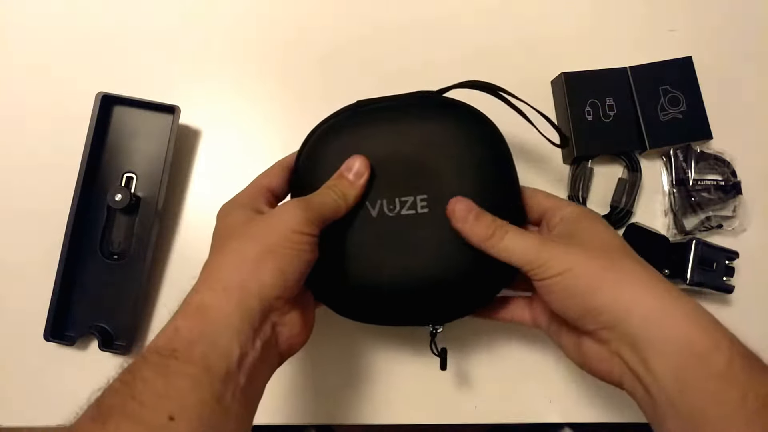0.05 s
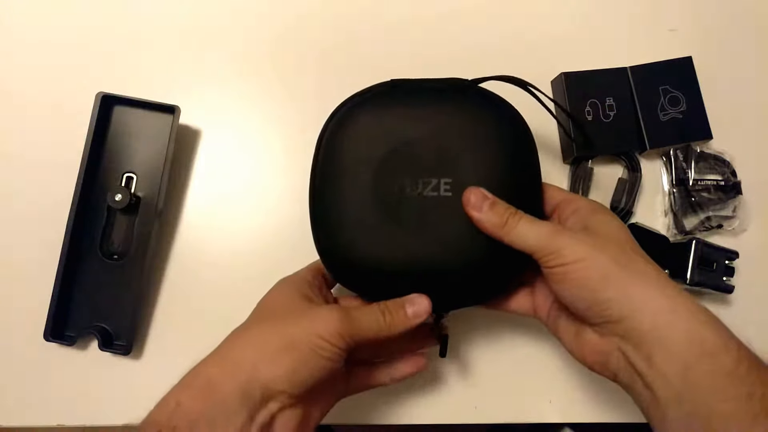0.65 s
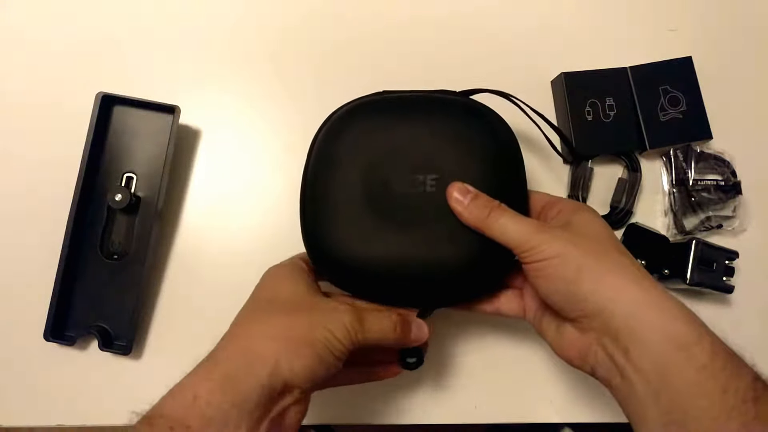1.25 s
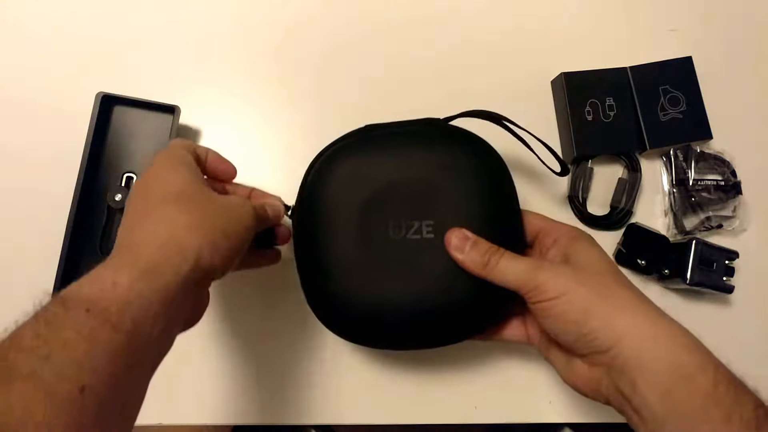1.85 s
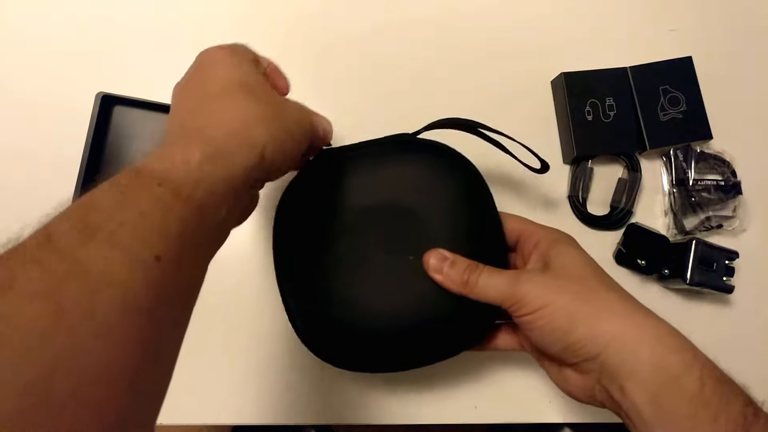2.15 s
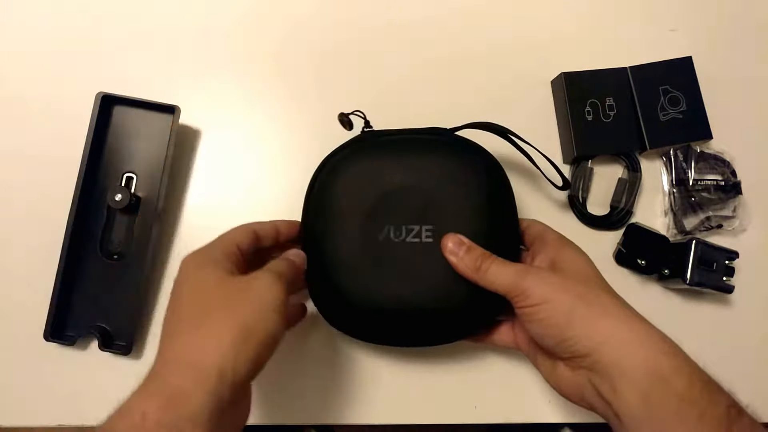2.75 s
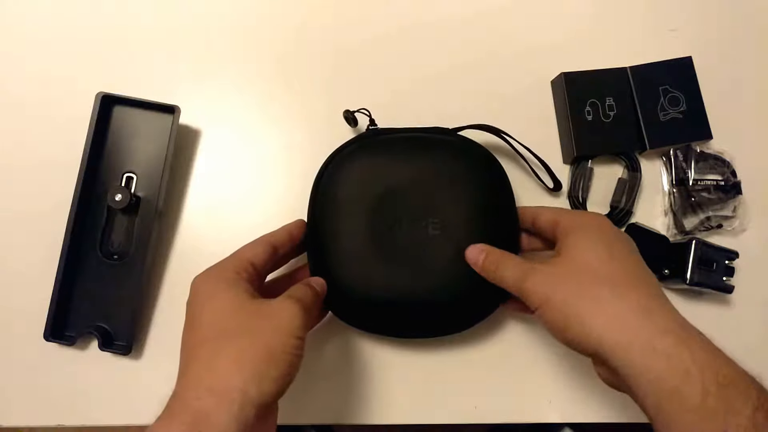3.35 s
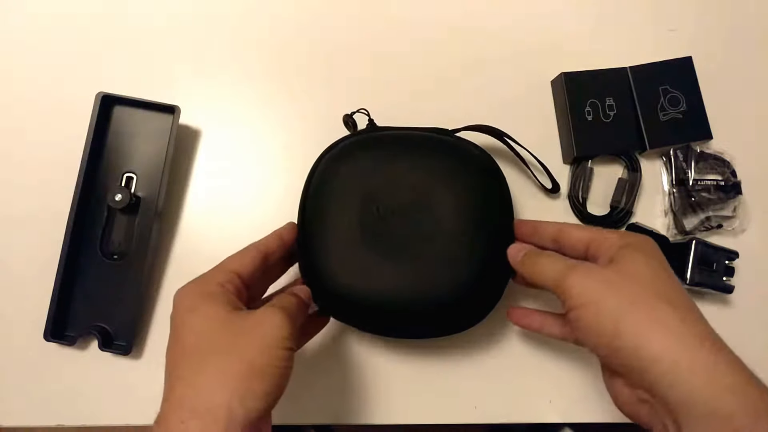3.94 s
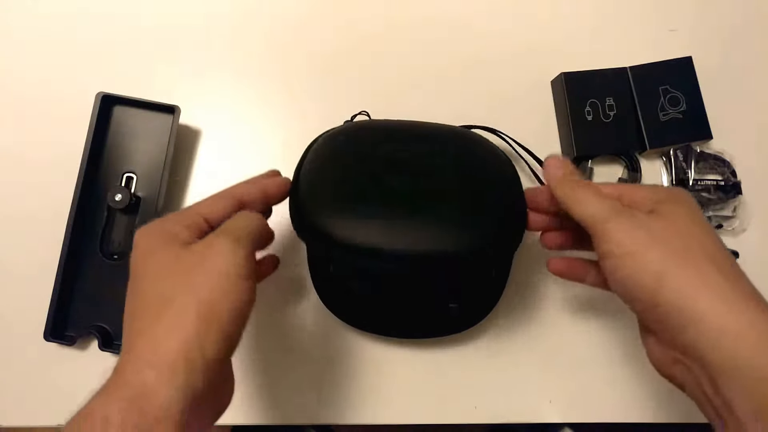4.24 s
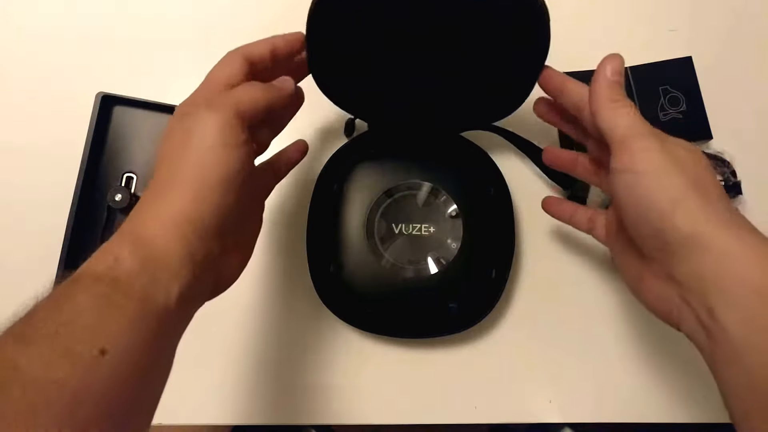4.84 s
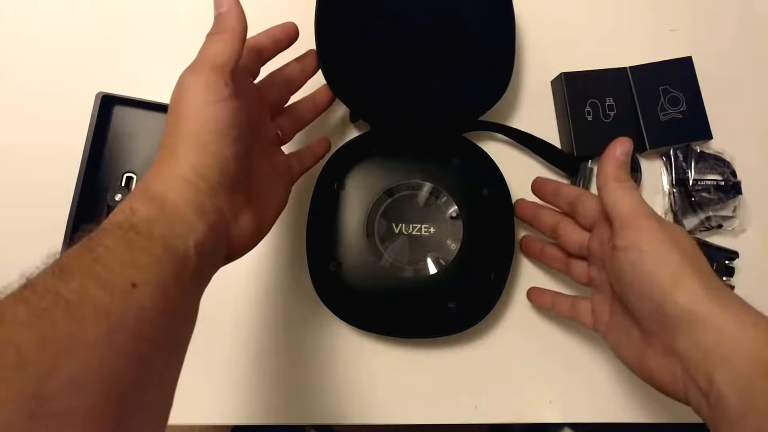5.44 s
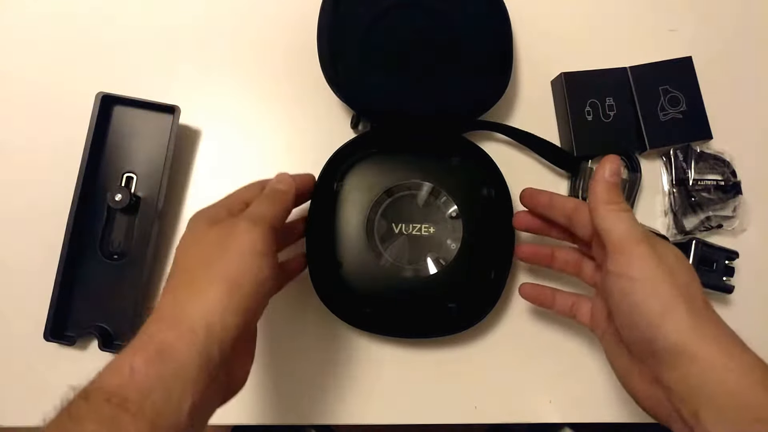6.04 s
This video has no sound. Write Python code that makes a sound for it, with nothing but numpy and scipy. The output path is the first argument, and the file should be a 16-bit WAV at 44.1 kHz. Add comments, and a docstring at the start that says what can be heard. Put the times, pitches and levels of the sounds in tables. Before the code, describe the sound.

In a small, quiet room, a zip slider breaks free with a bright clack and rasps along a small hard case in one short pull. Hands then rub and shift the fabric-covered shell, making light ticks, dull bumps and a brief scrape. Near the end, a hard edge knocks on the table, which booms briefly. Everything sounds close and to the right, over a low rumble and thin hiss.

```python
"""Unzipping a small hard case

On a table in a small room, a zip slider snaps free and rasps over the teeth, shaking the case's shell.
Hands rub and shift the case, which ticks and bumps softly; then a hard knock sets the table booming.
It all happens to the right of two microphones, over a low room rumble and a thin hiss."""
import sys
import numpy as np
from scipy import signal
from scipy.fft import rfft, irfft, next_fast_len
from scipy.io import wavfile
from scipy.ndimage import map_coordinates

SR = 44100
rng = np.random.default_rng(int(sys.argv[2]) if len(sys.argv) > 2 else 0)


def master_out(mix):
    """Clip the mix to full scale and print it as 16-bit PCM to the path in sys.argv[1]."""
    frames = np.transpose(np.atleast_2d(mix))
    ceiling = np.clip(frames, -1, 1)
    pcm = np.round(ceiling * 32767).astype(np.int16)
    wavfile.write(sys.argv[1], SR, pcm)


N = 272973

# How fast the slider moves. Each row: time in seconds, teeth per second.
SLIDER_SPEED = [(1.355, 62), (1.41, 185), (1.50, 259), (1.53, 308), (1.57, 257), (1.63, 330), (1.69, 214),
                (1.72, 281), (1.755, 291), (1.84, 184), (1.93, 182), (1.99, 142), (2.04, 184), (2.11, 281),
                (2.16, 234)]
# How hard the hand pulls. Each row: time in seconds, strength in dB.
HAND_PULL = [(1.36, -51.5), (1.396, -48), (1.474, -48), (1.49, -44.5), (1.578, -46.5), (1.604, -52.5),
             (1.754, -47.5), (1.764, -50), (1.84, -48.5), (1.92, -55.5), (1.952, -48), (1.972, -52),
             (2.122, -47.5), (2.18, -48.5)]
# The tone of each part of the zip. Each row: frequency in Hz, relative level in dB.
FIRST_SIDE_TONE = [(100, -30), (400, -11.5), (620, -11.5), (850, -1.5), (1030, -15), (1300, 1.5),
                   (1700, -1), (2050, 3.5), (2350, -5.5), (2750, -6), (3400, -12), (4600, -11.5),
                   (7000, -56)]  # the shell before the corner
SECOND_SIDE_TONE = [(100, -17), (340, -1), (560, -15), (820, 0.5), (1030, -5.5), (1350, 2), (1650, -5),
                    (2150, 3), (2550, -6.5), (3050, 0), (3600, -11.5), (4600, -21), (7000, -48)]  # the shell past the corner
TEETH_TONE = [(1500, -36), (3000, -19), (3900, -5), (4500, -4.5), (5200, 2), (5700, -1.5), (6400, -4),
              (7500, -8.5), (9000, -16.5), (15500, -32)]
TAPE_TONE = [(4000, -29), (8500, -1.5), (10700, -3), (12600, -2), (15300, 4.5)]  # the slider's fine hiss on the cloth tape

def zipper(start=1.358, end=2.1865, usual_pull_db=-49.5, usual_rate=165, buzz_hz=264, whine_hz=880):
    """Each tooth snaps out of the slider; the other row answers in between and the tape scrapes along."""
    t = np.arange(N) / SR
    rate, = curves(SLIDER_SPEED)
    pull_db, = curves(HAND_PULL)
    moving = np.clip((t - start) / 0.0034, 0, 1) * np.clip((end - t) / 0.0084, 0, 1)
    teeth_passed = np.cumsum(rate * (t > start)) / SR
    in_open = np.interp(t, (1.83, 1.865), [0, 1])  # the slider comes out from behind the case
    teeth = np.zeros(N)
    for offset, row_db in ((.5, 0), (1, -11)):
        early_or_late, strength = rng.standard_normal((300, 2)).T
        places = np.arange(300) + offset + .015 * early_or_late
        at = np.searchsorted(teeth_passed, places).clip(0, N - 1)
        teeth += np.bincount(at, amp(row_db + 1.2 * strength) * np.sqrt(SR / rate[at]), N)
    # a tooth chatters briefly as it leaves its neighbour
    life = 0.00042 * SR
    chatter_power = signal.lfilter([1 / life], [1, -np.exp(-1 / life)], teeth ** 2)
    chatter = np.sqrt(np.abs(chatter_power)) * rng.standard_normal(N)
    scrape = rng.standard_normal(N) * amp(1.2 * wobble(250))
    scrape_share = np.clip((.3 - .14 * in_open) * (rate / usual_rate) ** 0.82, 0, 1)
    snaps = 0.73 * teeth + .5 * chatter
    force = moving * (np.sqrt(1 - scrape_share) * snaps + np.sqrt(scrape_share) * scrape)
    # the shell bends in waves, and low pitches arrive later (about 2 ms at 1000 Hz)
    bent = filtered(force, lambda hz: np.exp(-4j * np.pi * 0.002012 * np.sqrt(1000 * hz)))
    turn = np.interp(t, (1.81, 1.82), [0, np.pi / 2])  # the slider rounds the corner
    drive = bent * amp(pull_db + 1.5)
    rasp = coloured(drive * np.cos(turn), FIRST_SIDE_TONE)
    rasp += coloured(drive * np.sin(turn), SECOND_SIDE_TONE)
    # the teeth grow clearer as the slider nears the microphones
    click_db = pull_db - 12 + 11.5 * (np.clip(t, start, end) - start) + 5.5 * in_open
    tape_db = -65.5 + 2.5 * (pull_db - usual_pull_db) + 8 * in_open
    clicks = coloured(-force * amp(click_db), TEETH_TONE) + coloured(force * amp(tape_db), TAPE_TONE)
    # the teeth pump the shell; the stiff hinge side holds this buzz down for the first 40 or so
    buzz_db = pull_db - 3.5 - 12 / (1 + (teeth_passed / 40) ** 10)
    phase = 2 * np.pi * teeth_passed
    buzz = amp(buzz_db + 2 * wobble(70)) * np.sin(phase + 0.43 * wobble(120))
    buzz /= np.hypot(1, (rate - buzz_hz) / 38)
    # the shell sings when 3 or 4 times the tooth rate meets its own pitch
    whine = sum(np.sin(k * phase + .5 * wobble(60)) / np.hypot(1, (k * rate - whine_hz) / 40)
                for k in (3, 4))
    return rasp + clicks + moving * (buzz + amp(pull_db - 3.5) * whine)


# The slider's ringing notes. Each row: pitch in Hz, relative level in dB, fade time in seconds.
SLIDER_NOTES = [(210, -14, 0.033), (336, -16, 0.02), (784, -10, 0.016), (1220, -7.5, 0.015),
                (2130, -2, 0.01), (2460, 0, 0.0067)]
# The tone of a small crack, here and in the ticks. Each row: frequency in Hz, relative level in dB.
CRACK_TONE = [(300, -9), (1000, -0.5), (2800, 3), (4200, -3), (6000, -1.5), (8000, -17.5), (15000, -11.5)]

def slider_clack(start=1.3383, db=-21):
    """The slider breaks free with one bright clack, then settles against the first tooth."""
    out = np.zeros(N)
    add(out, start, amp(db) * ringing(SLIDER_NOTES, scatter_db=.5, attack=0.00049))
    add(out, start, amp(db - 12) * snap(CRACK_TONE, grit=0.25, fade=0.0091))
    add(out, start + 0.0069, amp(db - 18.5) * snap(FIRST_SIDE_TONE, grit=0.24, fade=.008))
    return out


# An edge lands in quick hits. Each row: start in seconds, relative crack and thump levels in dB.
KNOCK_HITS = [(5.5521, -23.5, -50), (5.5527, -26, -36), (5.5538, -24, -19), (5.5567, -31, -32.5),
              (5.5856, -46, -26.5)]
# The tone of the edge's crack. Each row: frequency in Hz, relative level in dB.
EDGE_TONE = [(250, -10.5), (560, 2), (750, -1), (1150, -1.5), (1350, -4), (1750, -7), (2300, -6),
             (4300, -8.5), (5600, -11), (6600, -21), (8200, -31), (15000, -36)]
# The table's ringing notes. Each row: pitch in Hz, relative level in dB, fade time in seconds.
TABLE_NOTES = [(85, -27, 0.27), (116.4, -5, 0.41), (181.1, -3.5, 0.54), (210.3, -8.5, 0.37),
               (254.5, -13.5, 0.19), (306, -21, .18), (351, -10, 0.15), (410, -15.5, 0.098),
               (591, -20, .13)]

def knock():
    """A hard edge cracks against the table; its weight follows and makes the top boom."""
    out = np.zeros((2, N))
    boom = np.zeros(N)
    thud_notes = [(216, -0.5, 0.027), (300, -15, 0.0053)]
    for start, crack_db, thump_db in KNOCK_HITS:
        crack = amp(crack_db + 3) * snap(EDGE_TONE, grit=0.15, fade=0.0064)
        add(out, start, in_room(np.pad(crack, (0, SR // 2)), echo_db=-3.5))
        add(boom, start, amp(thump_db - 9) * ringing(TABLE_NOTES, scatter_db=1, attack=0.0013))
        add(boom, start, amp(thump_db + 5) * ringing(thud_notes, scatter_db=0.5, attack=0.00037))
    edge_ping = amp(-12) * ringing([(1750, 0, 0.0082)], scatter_db=1, attack=0.0013)
    add(out, KNOCK_HITS[0][0], in_room(edge_ping, echo_db=-13.5))
    return out + in_room(boom, echo_db=-10)


# Taps of the shell and zip pull. Each row: time in seconds, relative level in dB,
# favoured pitch in Hz, then level changes in dB for the crack and for the rim.
TAPS = [(0.201, -43.5, 2136, 3, -3.5), (0.245, -50.5, 1220, -19, -13), (2.578, -56.5, 1430, -8, -10),
        (2.718, -54.5, 1310, -16, -18), (2.756, -55, 840, -23, -18), (2.815, -45.5, 966, -4, -7),
        (2.873, -48.5, 950, -29, -13), (2.923, -50, 970, -20, -10), (2.985, -41, 940, -17, -13),
        (3.256, -42, 735, -24, -17), (3.612, -46, 940, -19, -28), (3.828, -37.5, 1140, -22, -4.5),
        (4.469, -45.5, 890, -17, -14), (4.603, -46.5, 1100, -24, -12), (4.656, -48, 1220, -25, -18),
        (4.842, -60.5, 1145, 3, -20), (5.378, -43, 1220, -15.5, -15.5)]
# The case's ringing notes. Each row: pitch in Hz, relative level in dB, fade time in seconds.
SHELL_NOTES = [(794, -2.5, 0.017), (1020, 1, 0.012), (1135, -2, 0.019), (1268, 2, 0.015)]
RIM_NOTES = [(1585, -4.5, 0.011), (1974, 3.5, 0.0087), (2576, -5, 0.0091), (3410, -6, 0.0071)]  # stiffer, so higher

def ticks(focus_db_per_octave=13):
    """Light taps ring the shell; the spot touched favours the notes near one pitch."""
    out = np.zeros(N)
    for time, db, pitch, crack_db, rim_db in TAPS:
        start = time + .0006
        notes = [(hz, level - focus_db_per_octave * abs(np.log2(hz / pitch)), fade)
                 for hz, level, fade in SHELL_NOTES]
        add(out, start, amp(db) * ringing(notes, scatter_db=3, attack=0.00055))
        add(out, start, amp(db + rim_db + 6) * ringing(RIM_NOTES, scatter_db=2.5, attack=0.00094))
        add(out, start, amp(db + crack_db + 4.5) * snap(CRACK_TONE, grit=1, fade=0.012))
    return out


# Soft landings. Each row: start in seconds, relative level in dB, pitch in Hz, fade time in seconds.
CASE_BUMPS = [(2.986, -34.5, 87.6, 0.063), (3.022, -40, 73.4, 0.1), (3.239, -39, 78, 0.084),
              (3.269, -36.5, 66, 0.1)]

def bumps():
    """The padded case meets the table with dull thuds."""
    out = np.zeros(N)
    for start, db, hz, fade in CASE_BUMPS:
        notes = [(hz, db + 3, fade), (hz * 2.23, db - 11, fade)]
        add(out, start, ringing(notes, scatter_db=1.5, attack=0.0027))
    return out


# Hand strokes. Each row: start and length in seconds, relative skin and case levels in dB.
HAND_STROKES = [(0.012, 0.51, -80.5, -65), (2.755, 0.1, -77, -63.5), (2.889, 0.16, -67, -59),
                (3.159, 0.25, -62.5, -59.5), (3.502, 0.27, -69, -64.5), (3.816, 0.13, -75.5, -80),
                (4.95, 0.28, -89, -77), (5.88, 0.43, -68.5, -68.5)]
# The tones of rubbing skin and of the case under it. Each row: frequency in Hz, relative level in dB.
SKIN_TONE = [(300, -6.5), (600, -1.5), (900, 3.5), (1300, -1.5), (1800, -2.5), (2600, -4.5), (3600, -7.5),
             (5500, -10.5), (7500, -20.5), (15000, -39)]
CASE_TONE = [(120, -1), (220, 1), (390, 2.5), (520, -14.5), (900, -38.5)]

def hands():
    """Skin catches and slides on the fabric-covered shell in uneven little grains."""
    skin_gain, case_gain = np.zeros((2, N))
    for start, length, skin_db, case_db in HAND_STROKES:
        press = stroke(start, length, attack=0.12, release=0.08)
        skin_gain += amp(skin_db - 1) * press
        case_gain += amp(case_db - 4) * press
    grains = rng.standard_normal(N) * unit(amp(3.1 * wobble(400) + 2.1 * wobble(30)))
    return coloured(grains * skin_gain, SKIN_TONE) + case_gain * noise(CASE_TONE)


# Finger wipes. Each row: middle and half length in seconds, level in dB, strongest frequency in Hz.
FINGER_WIPES = [(0.092, 0.03, -70.5, 2800), (0.096, 0.029, -74.5, 5900), (0.118, 0.01, -68, 740),
                (0.957, 0.0056, -73, 2010), (1.286, .02, -73, 1960), (3.766, 0.035, -69.5, 2570),
                (3.974, 0.017, -70, 910), (5.009, 0.021, -73.5, 1880), (5.509, 0.055, -70, 1690)]

def finger_wipes():
    """A fingertip wipes the shell: a short swell of grainy noise."""
    t = np.arange(SR // 2) / SR - .25
    out = np.zeros(N)
    for middle, half, db, hz in FINGER_WIPES:
        swell = amp(db) * np.exp(-.5 * (t / half) ** 2) * rng.standard_normal(len(t))
        tone = [(hz / 4, -26), (hz * 0.58, -11), (hz, 0), (hz * 1.26, -9), (hz * 4, -28)]
        add(out, max(middle + t[0], 0), coloured(swell, tone)[t >= -middle])
    return out * amp(3 * wobble(300))


# Shoves of the case. Each row: start in seconds, length in seconds, level in dB.
SHOVES = [(3.205, 0.049, -57), (3.338, 0.065, -64)]
# The tone of scraping fabric. Each row: frequency in Hz, relative level in dB.
FABRIC_TONE = [(250, -13), (560, 3), (720, -4), (950, 6), (1400, -3.5), (2200, -8), (4000, -20),
               (7500, -23.5), (11000, -23), (15500, -16)]

def drag():
    """The fabric cover scrapes across the table top, thread by thread."""
    grains = unit(rng.standard_normal(N) * amp(3 * wobble(500) + 0.85 * wobble(40)))
    push = sum(amp(db) * stroke(start, length, attack=0.022, release=0.039)
               for start, length, db in SHOVES)
    return coloured(grains * push, FABRIC_TONE)


# How long the room echoes. Each row: frequency in Hz, fade time in seconds.
ECHO_FADE = [(120, 0.5), (400, 0.36), (1000, 0.32), (3000, 0.43), (6000, 0.38), (14000, 0.15)]
# The echo's tone. Each row: frequency in Hz, boost or cut in dB.
ECHO_TONE = [(100, -0.5), (400, -1), (2000, 2), (5000, 0), (8000, -1), (15000, 9)]
# The balance between the microphones. Each row: frequency in Hz, left level minus right level in dB.
DIRECT_BALANCE = [(200, 0.5), (500, -6.5), (900, -6), (1400, -9), (2200, -43), (5000, -28), (10000, -17.5),
                  (15000, -10)]
ECHO_BALANCE = [(250, 6), (600, -6), (1300, -7), (2500, -11.5), (5000, -20), (10000, -53)]

def in_room(sound, echo_db, left_delay_s=0.00019):
    """A sound reaches the right microphone first, then the left, and the room echoes it."""
    hz, t, (left, right) = signal.stft(rng.standard_normal((2, SR // 2)), SR, nperseg=256)
    alike = 1 / (1 + (hz[:, None] / 600) ** 4)  # the bass is alike on both sides
    pair = np.array([alike * right + np.sqrt(1 - alike ** 2) * left, right])
    fading = amp(-60 * t / along(ECHO_FADE, hz)[:, None]) * np.clip(t / 0.0054, 0, 1)
    tail = signal.istft(pair * fading, SR, nperseg=256)[1]
    tail = filtered(tail / np.linalg.norm(tail[1]), lambda f: amp(along(ECHO_TONE, f)))
    echo = signal.fftconvolve(sound[None], tail, axes=1)[:, :len(sound)]
    direct = filtered(sound, lambda f: np.exp(-2j * np.pi * np.outer([left_delay_s, 0], f)))
    return shaded(direct, DIRECT_BALANCE) + amp(echo_db) * shaded(echo, ECHO_BALANCE)


def shaded(pair, balance):
    """The left microphone faces away from the sound and loses its treble."""
    def gains(hz):
        left = amp(along(balance, hz))
        return 2 * np.array([left, np.ones_like(hz)]) / (1 + left)
    return filtered(pair, gains)


# The tones of the background. Each row: frequency in Hz, relative level in dB.
RUMBLE_TONE = [(15, -52), (25, -11), (54, 3), (81, -0.5), (136, -5.5), (198, -12.5), (233, -13), (248, -20),
               (264, -26.5), (284, -32.5), (352, -23.5), (500, -80), (650, -48), (1100, -120)]
HISS_TONE = [(100, 13.5), (500, 1.5), (1000, 3.5), (2000, 1.5), (3000, -1.5), (5000, -4.5), (7500, -11),
             (10000, -10.5), (12500, -5.5), (15500, 0)]

def background():
    """The room rumbles, much the same on both sides, and each microphone adds its own hiss."""
    rumble_gain = amp(-63.5 + 1.1 * wobble(2.97))
    rumble = noise(RUMBLE_TONE) + 0.44 * np.array([noise(RUMBLE_TONE), noise(RUMBLE_TONE)])
    return rumble_gain * rumble + amp(-67) * np.array([noise(HISS_TONE), noise(HISS_TONE)])


def ringing(notes, scatter_db, attack):
    """A struck thing rings: each note starts at a slightly random level and drops 60 dB per fade time."""
    t = np.arange(SR // 2) / SR
    ring = np.zeros(len(t))
    for k, (hz, db, fade) in enumerate(notes):
        level = amp(db + scatter_db * rng.standard_normal() - 60 * t / fade)
        ring += (-1) ** k * level * np.sin(2 * np.pi * hz * t)
    return ring * (1 - np.exp(-t / attack))


def snap(tone, grit, fade):
    """One hard contact: a click with a short gritty tail, scaled to a peak of 1."""
    t = np.arange(SR // 20) / SR
    burst = coloured((t == 0) + grit * rng.standard_normal(len(t)) * amp(-60 * t / fade), tone)
    return burst / np.abs(burst).max()


def stroke(start, length, attack, release):
    """The strength of one hand movement: it swells around its start, holds and dies away."""
    t = np.arange(N) / SR - start
    return np.clip(.5 + t / attack, 0, 1) * np.exp(-np.maximum(t - length, 0) / release)


def amp(db):
    """Turn decibels into a multiplier."""
    return 10 ** (np.asarray(db) / 20)


def unit(x):
    """Scale a signal to an average power of 1."""
    return x / np.sqrt(np.mean(x ** 2) + 1e-20)


def along(points, hz):
    """Read between the rows of a frequency table, with octaves evenly spaced."""
    frequencies, values = np.transpose(points)
    return np.interp(np.log(hz + 1), np.log(frequencies + 1), values)


def curves(rows):
    """Join the rows of a time table with straight lines, one value per sample."""
    times, *columns = np.transpose(rows)
    return [np.interp(np.arange(N) / SR, times, column) for column in columns]


def wobble(rate):
    """A smooth curve through `rate` random values a second."""
    return map_coordinates(rng.standard_normal(int(N * rate / SR) + 4), [np.arange(N) * rate / SR])


def filtered(x, response):
    """Multiply each frequency in a sound by response(hz)."""
    n = x.shape[-1]
    size = next_fast_len(n + SR // 4)
    return irfft(rfft(x, size) * response(np.fft.rfftfreq(size, 1 / SR)), size)[..., :n]


def coloured(x, tone, size=4096):
    """Give a sound a tone, using a filter that leaves white noise equally strong."""
    log_shape = irfft(np.log(amp(along(tone, np.fft.rfftfreq(size, 1 / SR)))))
    fold = np.r_[1, np.full(size // 2 - 1, 2), np.zeros(size // 2)]  # ring after a hit, never before
    ring = irfft(np.exp(rfft(log_shape * fold)))
    return signal.fftconvolve(x, ring / np.linalg.norm(ring))[:len(x)]


def noise(tone):
    """Steady noise with the given tone."""
    return coloured(rng.standard_normal(N), tone)


def add(track, start, sound):
    """Mix a sound into a track at a start time in seconds."""
    part = track[..., round(start * SR):][..., :sound.shape[-1]]
    part += sound[..., :part.shape[-1]]


def scene():
    """The zip, the knock and the handling in their room, over the background."""
    unzipping = in_room(zipper(), echo_db=-9) + in_room(slider_clack(), echo_db=-9)
    hits = in_room(ticks(), echo_db=-9) + knock()
    handling = in_room(hands() + finger_wipes() + drag() + bumps(), echo_db=-6.5)
    return unzipping + hits + handling + background()


def record(dry, low_cut_hz=48, top_hz=15850):
    """The recorder cuts the deepest bass and the highest treble."""
    cut = signal.sosfilt(signal.butter(4, low_cut_hz, "highpass", fs=SR, output="sos"), dry)
    return filtered(cut, lambda hz: hz < top_hz)


dry = scene()
out = record(dry)
master_out(out)
```